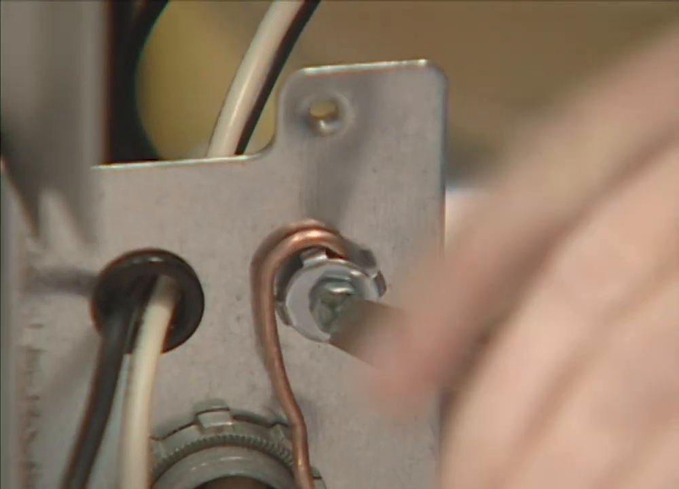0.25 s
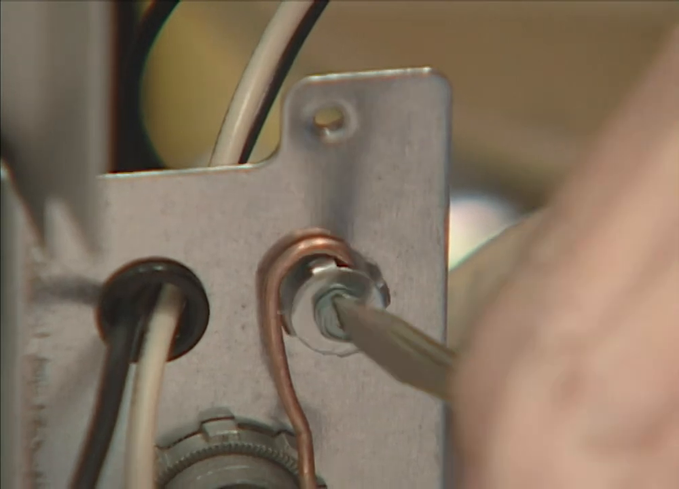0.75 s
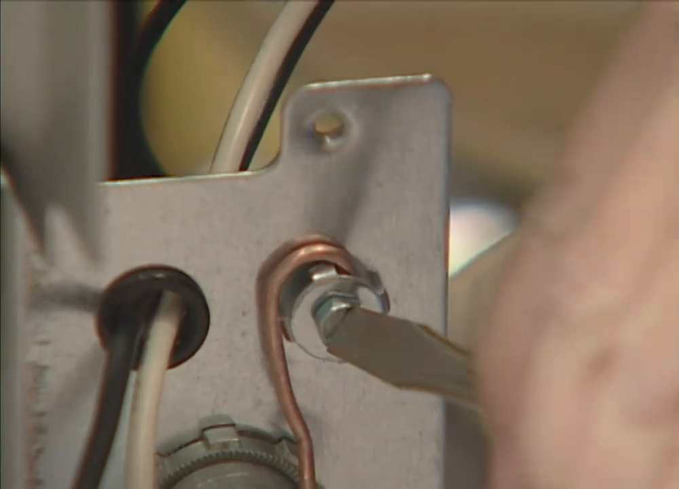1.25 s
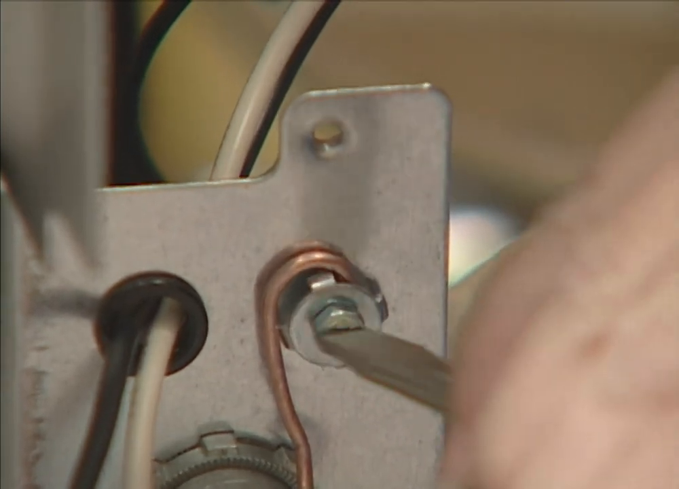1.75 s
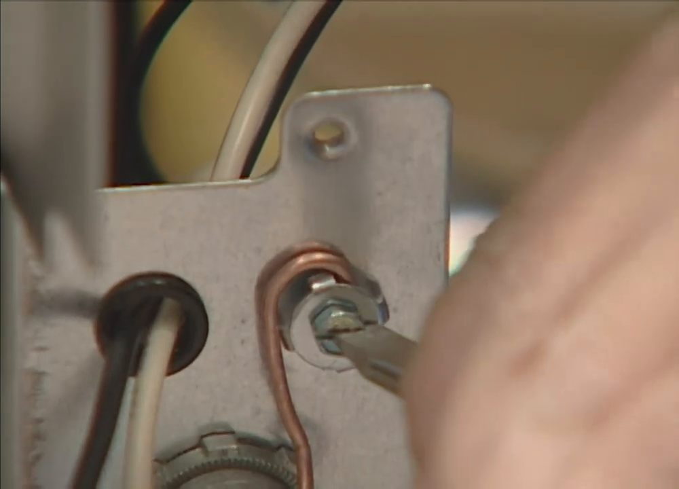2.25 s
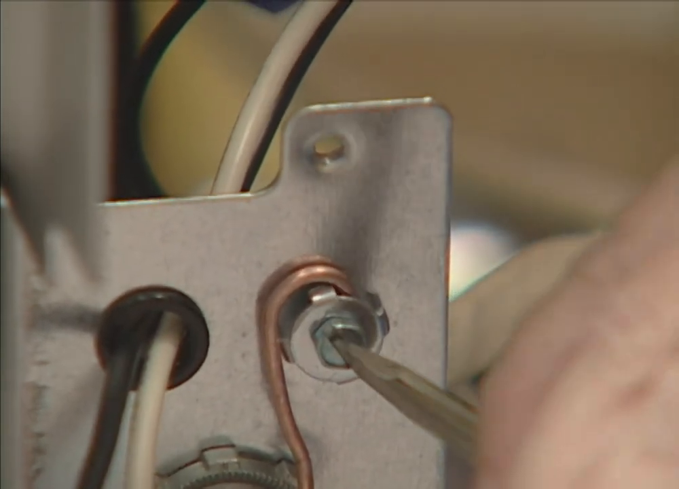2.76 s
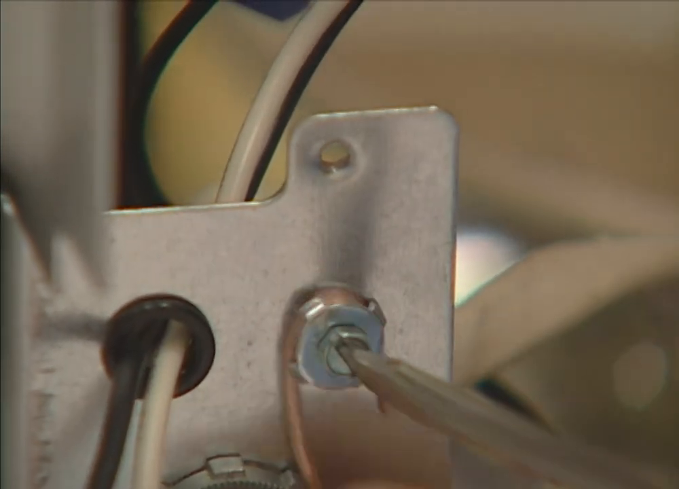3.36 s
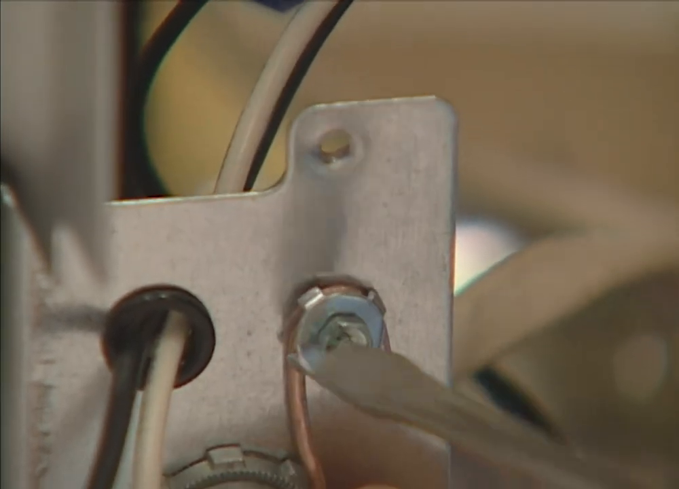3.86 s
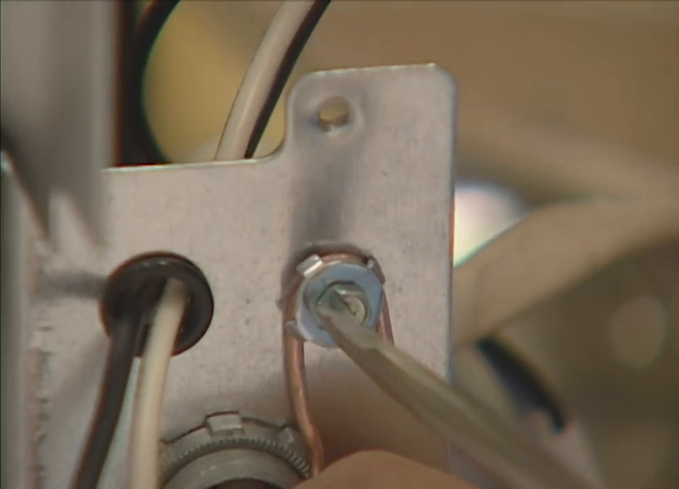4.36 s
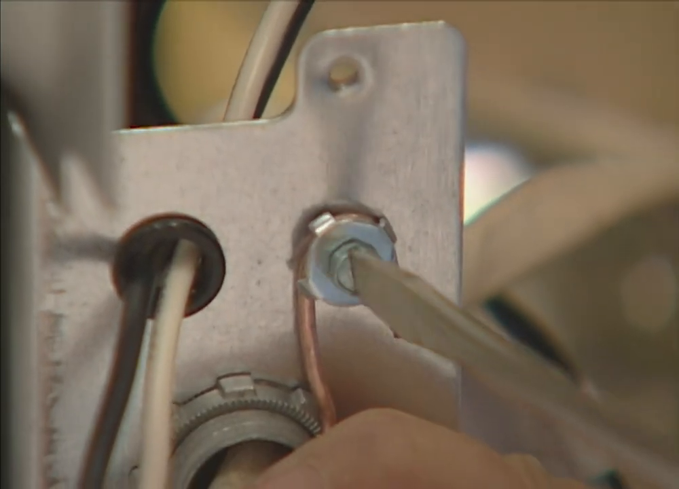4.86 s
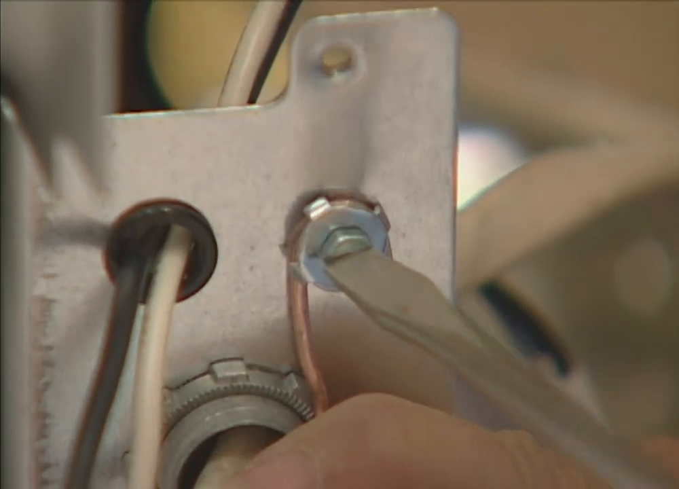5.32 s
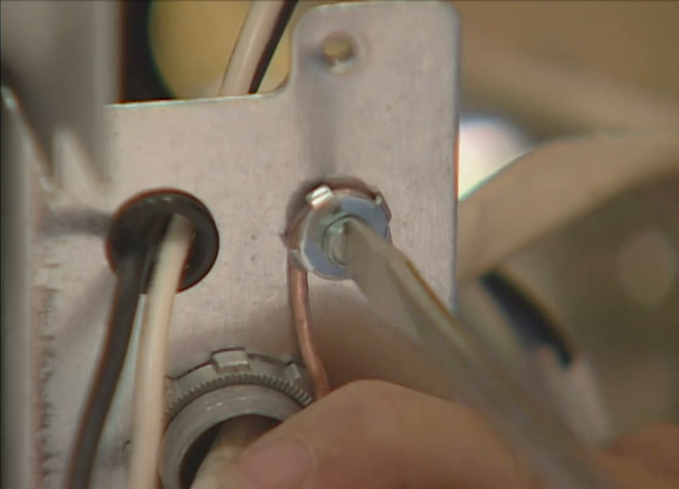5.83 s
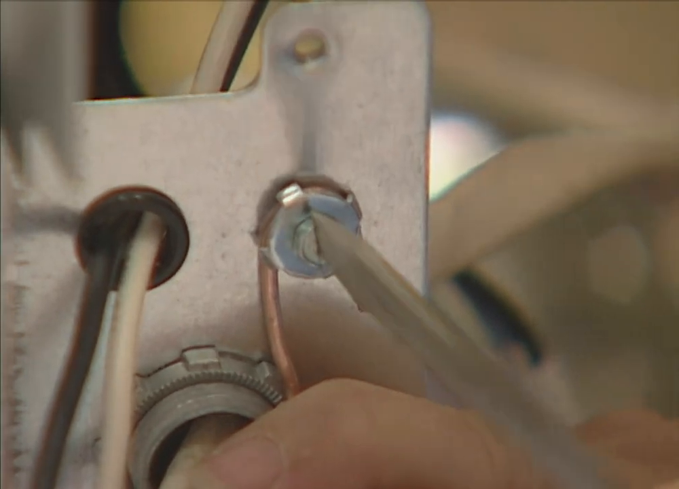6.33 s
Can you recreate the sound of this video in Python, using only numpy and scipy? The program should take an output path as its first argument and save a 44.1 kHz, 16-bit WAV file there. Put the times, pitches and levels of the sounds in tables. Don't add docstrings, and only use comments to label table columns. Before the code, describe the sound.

Close, irregular metal clicks, faint scraping and short bracket rings as a screw is tightened, with one hard snap midway and a loud knock near the end.

```python
import sys
import numpy as np
from scipy import signal
from scipy.fft import rfft, irfft, next_fast_len
from scipy.io import wavfile
from scipy.ndimage import uniform_filter1d, map_coordinates

SR = 44100
rng = np.random.default_rng(int(sys.argv[2]) if len(sys.argv) > 2 else 0)


def persist_wave(psi):
    counts = np.round(np.clip(psi, -1, 1) * 32767).astype(np.int16)
    wavfile.write(sys.argv[1], SR, np.atleast_2d(counts).T)


def linear_from_db(decibels):
    return 10 ** (np.asarray(decibels, float) / 20)


N = 290551
SPAN = SR * 3 // 10


def unit(x):
    return x / np.sqrt(np.mean(x ** 2) + 1e-20)


def along(points, hz):
    f, v = np.transpose(points)
    return np.interp(np.log(hz + 1), np.log(f + 1), v)


def wobble(rate):
    knots = rng.standard_normal(int(N * rate / SR) + 4)
    return map_coordinates(knots, [np.arange(N) * rate / SR])


def filtered(x, response):
    m = next_fast_len(x.shape[-1] + 4096)
    spectrum = rfft(x, m) * response(np.fft.rfftfreq(m, 1 / SR))
    return irfft(spectrum, m)[..., :x.shape[-1]]


def hump(hz, centre, db, octaves):
    return linear_from_db(db * np.exp(-(np.log2((hz + 1) / centre) / octaves) ** 2))


def room_tone():
    # f/Hz, density/dB per Hz
    drone_shape = [(12, -57), (20, -27), (60, -9), (86, -22), (102, -2), (122, 2), (145, -12), (176, -6),
                   (203, -19), (235, -8), (274, -20), (312, -10), (450, -25), (580, -55), (990, -120)]
    # f/Hz, density/dB per Hz
    rumble_shape = [(15, -31.5), (28, -16.5), (75, -9), (260, -24), (420, -43), (900, -120)]
    # f/Hz, density/dB per Hz
    air_shape = [(260, -30), (450, -4), (538, -5), (653, -2), (879, -2), (991, -5), (1370, -8),
                 (2980, -22.5), (3460, -21.5), (4020, -23.5), (5330, -25), (7620, -26), (15800, -31)]
    # t/s, level/dB
    hands = [(0.0, 1), (0.14, -3), (0.53, 1.5), (1.15, -2.5), (1.49, 1), (1.61, -2.5), (2.461, -2.5),
             (2.729, -2), (4.86, -3), (5.21, -0.5), (5.59, -1.5), (6.2, -2), (6.59, -2.5)]
    busy_db = np.interp(np.arange(N) / SR, *np.transpose(hands))
    drone = unit(filtered(rng.standard_normal(N),
                          lambda hz: linear_from_db(along(drone_shape, hz)) + linear_from_db(along(rumble_shape, hz))))
    air = unit(filtered(rng.standard_normal(N), lambda hz: linear_from_db(along(air_shape, hz))))
    below = lambda hz: 1 / (1 + (hz / 2600) ** 4)
    low, high = filtered(air, lambda hz: [below(hz), 1 - below(hz)])
    stir_db = 1.5 * wobble(7)
    drone_db = -56.5 + busy_db + stir_db - 1.58
    low_air_db = -68.5 + 0.98 * busy_db + 1.1 * stir_db - 1.28
    return linear_from_db(drone_db) * drone + linear_from_db(low_air_db) * unit(low) + linear_from_db(-78.0) * unit(high)


def whine():
    # f/Hz, level/dB
    whistle = [(15735, -94)]
    (hz, db), = whistle
    return linear_from_db(db + 5.0 + 2 * wobble(8)) * np.sin(2 * np.pi * hz * np.arange(N) / SR)


def patchy(x, db):
    z = signal.stft(x, nperseg=256)[2]
    field = uniform_filter1d(rng.standard_normal(z.shape), size=5, axis=0)
    field = uniform_filter1d(field, size=9, axis=1)
    return signal.istft(z * linear_from_db(db * unit(field)), nperseg=256)[1][:len(x)]


def blade_body(x, modes):
    def response(f):
        total = 0
        for k, (centre, width, db) in enumerate(modes):
            total = total + (-1) ** k * linear_from_db(db) * 1j * f * width / (centre ** 2 - f ** 2 + 1j * f * width)
        return total ** 2
    return unit(filtered(x, response))


def rubbing():
    # start t/s, end t/s, start level/dB, end level/dB, share of upper resonances/0-1
    strokes = [(0.0, 0.072, -65, -78, 0.37), (0.068, 0.17, -75, -58.5, 0.73),
               (0.184, 0.422, -71.5, -67.5, .25), (0.43, 0.477, -72, -61.5, 0.24),
               (0.757, 0.923, -75, -79, .45), (1.32, 1.36, -83, -65, .6), (1.37, 1.432, -60, -59, .75),
               (1.436, 1.49, -77, -86, 1), (2.535, 2.563, -81, -56, 0.87), (2.754, 2.95, -76.5, -86, 0.5),
               (3.125, 3.155, -79, -48.5, 0.97), (3.533, 3.757, -70.5, -80.5, 0.36),
               (4.91, 5.048, -70.5, -73.5, 0.7), (5.176, 5.3, -71, -84.5, .5),
               (5.599, 5.677, -67, -77.5, 0.77), (5.698, 5.749, -74.5, -69, 0.74),
               (5.766, 5.817, -72, -75, 0.6), (6.256, 6.414, -73, -96, 0.16), (6.58, 6.579, -101, -54, 0.3)]
    # f/Hz, width/Hz, level/dB
    blade_modes = [(4100, 610, -2), (5640, 1700, -3), (7050, 950, 0), (7970, 370, 0), (8600, 700, -2.5),
                   (9800, 620, 0.5), (11690, 3600, -6.5)]
    t = np.arange(N) / SR
    level = np.zeros(N)
    for start, end, start_db, end_db, _ in strokes:
        stroke_db = np.interp(t, [start, end], [start_db, end_db], left=-140)
        level += linear_from_db(stroke_db - 1495 * (t - end).clip(0))
    level = uniform_filter1d(level, size=300)
    middles = [(stroke[0] + stroke[1]) / 2 for stroke in strokes]
    upper = np.interp(t, middles, [stroke[4] for stroke in strokes]).clip(0, 1)
    slips = patchy(rng.standard_normal(N), 2.2) * linear_from_db(2 * wobble(900) + 2 * wobble(60))
    low, high = blade_body(slips, blade_modes[:4]), blade_body(slips, blade_modes[4:])
    return linear_from_db(-0.5) * level * (np.sqrt(1 - upper) * low + np.sqrt(upper) * high)


def firm_knocks():
    # t/s, crack level/dB, edge ring level/dB, bracket ring level/dB, chassis thump level/dB
    on_rim = [
        (0.1346, -71, -56, -44, -40),
        (1.5924, -35.5, -43.5, -37, -38.5),
        (5.4325, -18.5, -24.5, -26.5, -31.5),
        (6.124, -8, -19.5, -24, -30),
    ]
    on_head = [
        (0.4977, -18.5, -29.5, -32, -26),
        (1.0288, -33.5, -39.5, -36.5, -41),
        (1.8513, -29.5, -29.5, -35, -35),
        (2.7564, -74, -63, -55, -64.5),
        (5.1961, -47, -50, -37, -35),
    ]
    in_slot = [
        (1.4988, -36, -50.5, -33, -34),
        (1.805, -21, -32, -38.5, -28),
    ]
    on_washer = [
        (2.1614, -46.5, -48.5, -36.5, -43),
        (3.8913, -28.5, -29.5, -26, -26),
        (4.3041, -62, -61, -47, -44.5),
        (4.5815, -70, -55, -45, -46),
    ]
    glancing = [
        (1.4214, -41.5, -46, -43.5, -38),
        (2.5497, -59, -59.5, -52.5, -58),
        (4.2446, -28, -39.5, -43.5, -42.5),
    ]
    snaps = [
        (3.1998, -24, -56.5, -53.5, -48),
        (3.4147, -8, -28.5, -37.5, -21.5),
    ]
    on_shank = [
        (4.516, -16.5, -28, -34.5, -32),
        (5.881, -42.5, -45, -45, -43.5),
    ]
    # bracket f/Hz, edge f/Hz, chassis f/Hz, contact t60/s,
    # hollow knock over the mean of bracket and chassis/dB
    spots = [
        (817, 3000, 221, 0.018, -8.5),
        (787, 1740, 175, 0.034, -4),
        (712, 1800, 159, 0.057, -10),
        (786, 2000, 227, 0.027, -9),
        (738, 2000, 255, 0.038, -3.5),
        (731, 1900, 145, .045, 1),
        (830, 1720, 178, 0.035, -7.5),
    ]
    # brightest f/Hz, top octave lift/dB, clean edge ring over loose rattle/dB, room/dB
    sharpness = [
        (9400, -10, -5, 1.9),
        (9070, 4, -3.5, 1.5),
        (10700, 3, 0.5, 1.3),
        (9200, -13, -1, 0.3),
        (5330, -15, -8, 4.6),
        (9000, 8.5, -1.5, 5),
        (12100, -7.5, 2, 0),
    ]
    kinds = [on_rim, on_head, in_slot, on_washer, glancing, snaps, on_shank]
    rows = []
    for hits, spot, sharp in zip(kinds, spots, sharpness):
        for hit in hits:
            hollow_db = (hit[3] + hit[4]) / 2 + spot[4]
            rows.append((*hit, hollow_db, *spot[:3], *sharp, spot[3]))
    return rows


def light_contacts():
    # t/s, crack level/dB
    ticks = [(0.245, -57), (0.7735, -51.5), (0.8208, -42.5), (0.8529, -50), (0.9143, -55.5), (1.207, -54.5),
             (1.3438, -52.5), (1.3625, -45), (1.3861, -46.5), (1.3995, -41), (1.8636, -37.5),
             (2.0207, -55.5), (2.2201, -52.5), (2.4468, -57), (2.8854, -55), (2.9456, -53.5), (3.28, -52),
             (3.6088, -62), (4.8857, -46), (5.9398, -58.5), (6.0247, -57.5), (6.282, -57), (6.3626, -57)]
    # t/s, crack level/dB, bracket ring level/dB, chassis thump level/dB
    scuffs = [(0.1078, -59, -51.5, -53), (0.1467, -44, -43.5, -39), (0.166, -41, -41.5, -38),
              (0.1898, -68, -54, -43.5), (0.34, -76, -74, -48.5), (0.4363, -49, -55, -47),
              (0.5209, -30, -73, -27.5), (1.311, -61, -58, -42.5), (1.4585, -54, -51, -44),
              (1.8308, -33, -42, -42), (1.9412, -71, -86, -55), (2.3944, -58, -63, -51.5),
              (3.1298, -66, -52.5, -39.5), (3.138, -47.5, -51.5, -40), (3.1517, -51.5, -76, -39.5),
              (3.8723, -40, -45, -45), (3.8809, -39.5, -31, -37), (4.1415, -69.5, -59.5, -63),
              (4.5464, -65, -44, -38.5), (5.227, -55.5, -71, -44), (5.755, -58, -62, -48.5),
              (6.4438, -82, -63.5, -55), (6.569, -50.5, -54.5, -49.5), (0.451, -56, -44, -46),
              (4.268, -62, -42.5, -43.5), (0.575, -53, -76, -49), (2.87, -71, -70, -56)]
    # t/s, crack level/dB, bracket ring level/dB,
    # chassis thump level/dB, contact t60/s
    touches = [
        (0.474, -55, -50, -49, 0.27),
        (1.796, -41, -34, -61, 0.15),
        (4.498, -49, -46, -70, 0.17),
        (4.508, -40.5, -40, -54.5, 0.027),
        (5.426, -49, -35, -67, 0.079),
        (6.085, -59.5, -48.5, -54.5, 0.17),
        (6.118, -38.5, -40, -61, 0.061),
    ]
    # bracket f/Hz, edge f/Hz, chassis f/Hz, crack f/Hz, top lift/dB, clean ring/dB, room/dB
    light_spot = (770, 2000, 180, 8600, 0.5, 0.5, 0.3)
    t60 = 0.034
    light = [(s, db, db - 17.5, db - 15.5, db - 5.5, t60) for s, db in ticks]
    for s, db, ring_db, thump_db in scuffs:
        edge_db = db - 5 + 0.38 * (ring_db - db)
        light.append((s, db, edge_db, ring_db, thump_db, t60))
    light += [(s, db, db - 0.5, ring_db, thump_db, life) for s, db, ring_db, thump_db, life in touches]
    return [(*hit[:5], hit[4] - 7.5, *light_spot, hit[5]) for hit in light]


def chatter(t60, rise, stretch):
    t = np.arange(SPAN) / SR
    build_up = (1 - np.exp(-t / (rise + 0.054 * (t60 - 0.065).clip(0)))) ** 2
    decay = linear_from_db(-60 * t / (stretch * t60.clip(0.008, 0.2)))
    return build_up * decay * rng.standard_normal((len(t60), SPAN))


def to_peak(rows, width_s):
    power = np.abs(uniform_filter1d(rows ** 2, size=max(int(width_s * SR), 1), axis=1))
    return rows / np.sqrt(power.max(axis=1, keepdims=True))


def rung(force, modes, pitch, focus_db):
    hz, db, t60 = np.transpose(modes)[:, :, None]
    t = np.arange(SPAN) / SR
    favour_db = 1.8 * rng.standard_normal((len(force), len(modes)))
    favour_db = favour_db - np.minimum(focus_db * np.abs(np.log2(hz.T / pitch)), 15)
    sense = (-1) ** np.arange(len(modes))
    partials = linear_from_db(db - 60 * t / t60) * np.sin(2 * np.pi * hz * t)
    ring = (linear_from_db(favour_db) * sense) @ partials
    return signal.fftconvolve(force, ring, axes=1)[:, :SPAN]


def bright_crack(t60, crack_hz, top_db):
    # f/Hz, density/dB per Hz
    crack_shape = [(2060, -22.5), (3500, -17.5), (4750, -16), (6120, -11), (7000, -11.5), (8470, -9.5),
                   (9870, -7.5), (11700, -12.5), (12900, -20), (14100, -22.5), (16000, -32.5)]
    bright = lambda hz: linear_from_db(along(crack_shape, hz)) * hump(hz, crack_hz, 5, 0.22) * hump(hz, 15000, top_db, 0.4)
    return to_peak(filtered(chatter(t60, 0.0022, 0.7), bright), 0.0021)


def loose_rattle(t60, edge_hz):
    return to_peak(filtered(chatter(t60, 0.0043, 1.5), lambda hz: hump(hz, edge_hz, 21, 1.96)), 0.004)


def edge_ring(t60, edge_hz):
    # f/Hz, level/dB, t60/s
    edge_modes = [(1404, -28, .03), (1522, 4.5, 0.08), (1668, 0.5, 0.084), (1984, -4, 0.04),
                  (2086, 4, 0.0096), (2510, -2, 0.1), (2770, 4.5, 0.052), (2830, 4, 0.036),
                  (3180, 1, 0.039), (3253, -2.5, 0.078), (3405, 1.5, 0.0084), (4040, -14, 0.029)]
    return to_peak(rung(chatter(t60, 0.0012, 0.22), edge_modes, edge_hz, 16), 0.0055)


def bracket_ring(t60, bracket_hz):
    # f/Hz, level/dB, t60/s
    bracket_modes = [(598.3, 2.5, 0.051), (696.5, 6, 0.054), (768.5, -2, 0.04), (851, 3.5, 0.052),
                     (976, -9, 0.11), (1000, -3.5, 0.024)]
    blow = np.abs(chatter(t60, 0.00019, 0.032)) + 0.1 * chatter(t60, 0.0015, 1.0)
    swell = 1 - np.exp(-np.arange(SPAN) / SR / 0.0094)
    return to_peak(rung(blow, bracket_modes, bracket_hz, 61.3) * swell, 0.0054)


def hollow_knock(t60):
    # f/Hz, level/dB, t60/s
    box_modes = [(324.4, 2, 0.11), (422.4, -5.5, 0.11), (495.5, -3.5, 0.1), (620, -10, 0.016)]
    return to_peak(rung(chatter(t60, 0.0019, 1.0), box_modes, 430, 0), 0.007)


def chassis_thump(t60, chassis_hz):
    # f/Hz, level/dB, t60/s
    chassis_modes = [(97.2, 2, 0.17), (122.5, 0, 0.21), (181.4, 0.5, 0.19), (264, -5, 0.17),
                     (302.2, 5, 0.17)]
    thump = rung(np.abs(chatter(t60, 0.00064, 0.098)), chassis_modes, chassis_hz, 34)
    return to_peak(signal.lfilter(*signal.butter(2, 2 * 60 / SR, "high"), thump), 0.019)


def low_push(crack_db):
    t = np.arange(SPAN) / SR
    return linear_from_db(crack_db - 29 - 60 * t / 0.21) * np.sin(2 * np.pi * 33 * t) * (1 - np.exp(-t / 0.0099))


def room(near):
    # f/Hz, t60/s
    room_t60 = [(150, 0.33), (1000, 0.17), (4000, 0.19), (9000, 0.12), (13000, 0.12), (16000, 0.21)]
    # f/Hz, level/dB
    room_send = [(300, -13), (800, -7), (1600, -6), (3500, -12.5), (9000, -11), (14000, -11)]
    hz, when, z = signal.stft(rng.standard_normal(near.shape), SR, nperseg=256)
    near_walls = linear_from_db(-60 * when / along(room_t60, hz)[:, None])
    far_end = linear_from_db(-19.5 - 60 * when / 0.4)
    tail = signal.istft(z * (near_walls + far_end), SR, nperseg=256)[1][:, :SPAN]
    tail = tail / np.linalg.norm(tail, axis=1, keepdims=True)
    colour = np.sqrt(np.abs(uniform_filter1d(np.abs(rfft(near)) ** 2, size=130, axis=1)))
    send = linear_from_db(along(room_send, np.fft.rfftfreq(SPAN, 1 / SR)))
    answer = irfft(rfft(tail) * colour * send, SPAN)
    t = np.arange(SPAN) / SR
    return answer * (1 - np.exp(-t / 0.002)) ** 2 * np.clip(t[::-1] / 0.038, 0, 1)


def contacts():
    columns = np.array(firm_knocks() + light_contacts()).T[:, :, None]
    s, crack_db, edge_db, bracket_db, chassis_db, hollow_db = columns[:6]
    bracket_hz, edge_hz, chassis_hz, crack_hz, top_db, clean_db, wet_db, t60 = columns[6:]
    crack = linear_from_db(crack_db - 9) * bright_crack(t60, crack_hz, top_db)
    rattle = linear_from_db(-clean_db / 2 - 11.5) * loose_rattle(t60, edge_hz)
    edge = linear_from_db(edge_db) * (linear_from_db(clean_db / 2 - 9.5) * edge_ring(t60, edge_hz) + rattle)
    bracket = linear_from_db(bracket_db - 4.5) * bracket_ring(t60, bracket_hz)
    hollow = linear_from_db(hollow_db - 5.5) * hollow_knock(t60)
    chassis = linear_from_db(chassis_db - 9.0) * chassis_thump(t60, chassis_hz)
    near = crack + edge + bracket
    heard = near + chassis + hollow + low_push(crack_db) + linear_from_db(wet_db) * room(near)
    where = np.round((s - 0.0018) * SR).astype(int) + np.arange(SPAN)
    return np.bincount(where.ravel(), heard.ravel(), N + SPAN)[:N]


def scene():
    return (room_tone() + whine() + rubbing() + contacts())[None]


def band_limit(x):
    return signal.sosfilt(signal.butter(12, 16800, fs=SR, output="sos"), x)


def record(dry):
    rounded = dry / (1 + np.abs(dry / 0.27) ** 4) ** (1 / 4)
    mix = filtered(rounded, lambda hz: 1 / (1 + (hz / 15950) ** 100))
    return band_limit(mix)


dry = scene()
out = record(dry)
persist_wave(out)
```